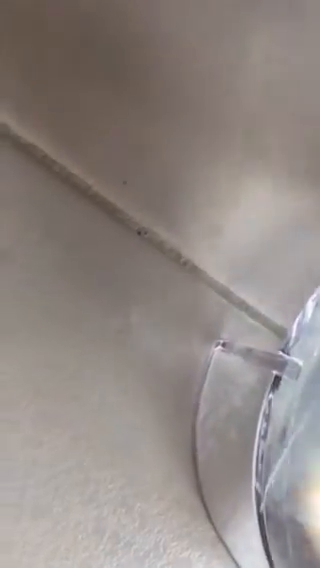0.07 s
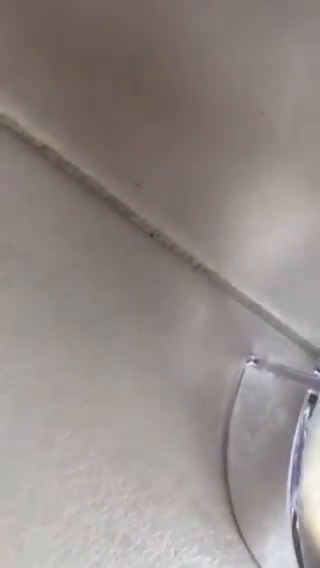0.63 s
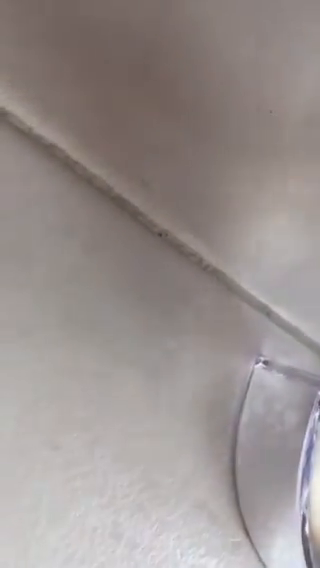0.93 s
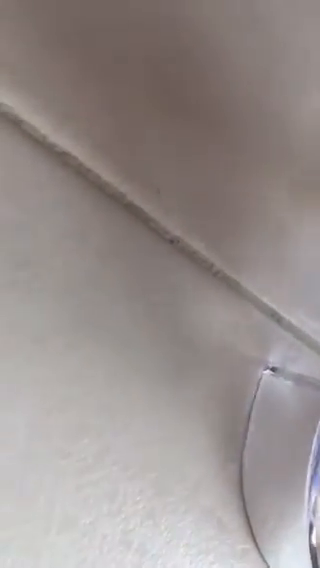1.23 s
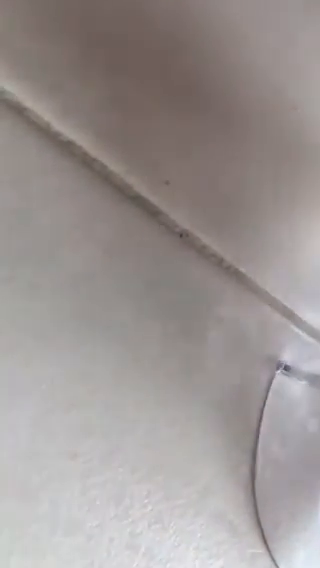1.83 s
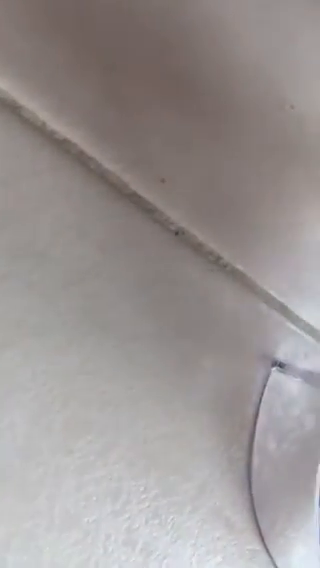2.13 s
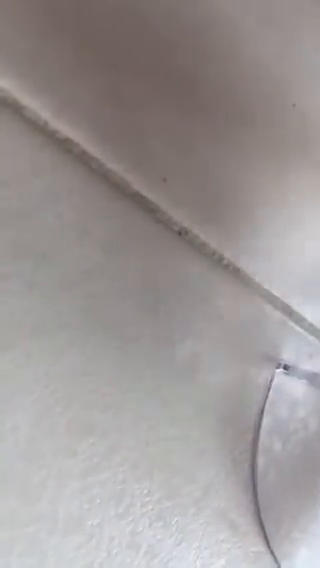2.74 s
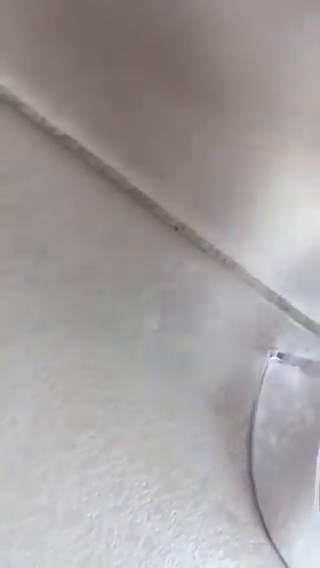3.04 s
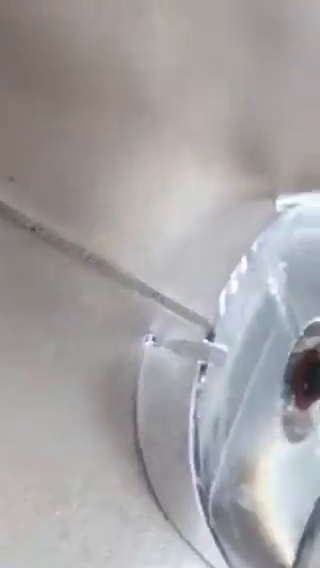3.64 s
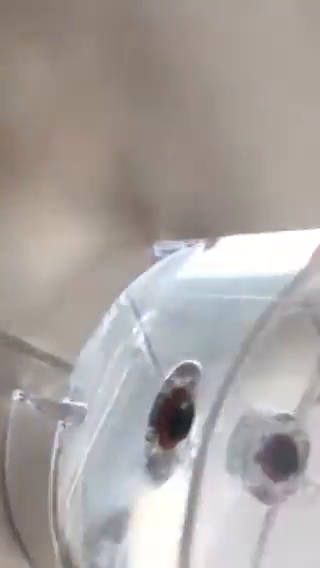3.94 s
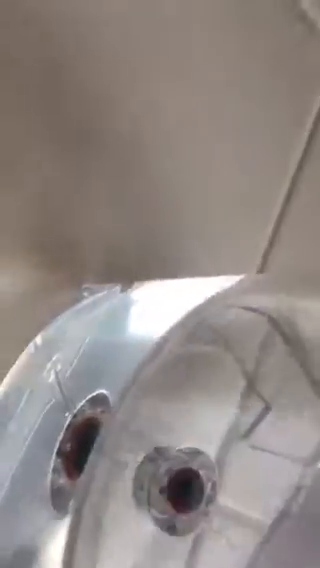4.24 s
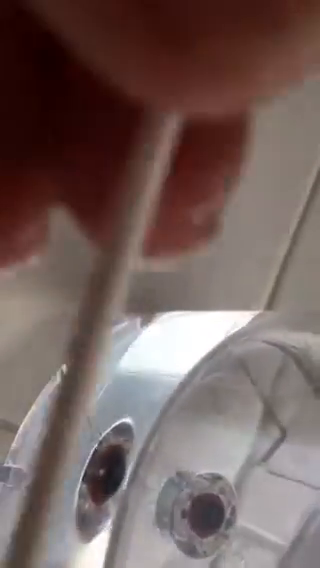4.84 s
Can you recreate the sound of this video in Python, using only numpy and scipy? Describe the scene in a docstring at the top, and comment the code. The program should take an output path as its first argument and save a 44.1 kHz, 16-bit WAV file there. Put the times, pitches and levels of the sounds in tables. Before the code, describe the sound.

Light clicks, soft rubs and short knocks from a thin plastic container being handled and put down in a quiet tiled room.

```python
"""A clear plastic tank is turned in the hands and set down, close to a phone in a tiled room.
Skin rubs and rasps over its thin walls, and plastic catching on plastic makes them tick and creak.
The tank gives short knocks against its fittings, lands with a hollow bump, then knocks twice more.
The room rings briefly after each sound, over a quiet rumble, a faint hiss and a low mains hum."""
import sys
import numpy as np
from scipy import signal
from scipy.fft import rfft, irfft, next_fast_len
from scipy.io import wavfile
from scipy.ndimage import map_coordinates

SR = 44100
rng = np.random.default_rng(int(sys.argv[2]) if len(sys.argv) > 2 else 0)


def generate_wav(signal):
    """Clip the signal to [-1, 1] and save it as 16-bit WAV at the path in sys.argv[1]."""
    frames = np.transpose(np.atleast_2d(signal))
    scaled = np.clip(frames, -1, 1) * 32767
    pcm = np.round(scaled).astype(np.int16)
    wavfile.write(sys.argv[1], SR, pcm)


N = 223843

# A "colour" says how strong each frequency is next to the others.
# A "ring time" (t60) is how long a sound takes to fade by 60 dB.
# The low rumble of the quiet room. Each row: frequency in Hz, relative level in dB.
RUMBLE_COLOUR = [(15, -41), (25, 21), (38, -5.5), (123, -2.5), (216, -9.5), (265, -7), (378, -8.5),
                 (530, -21.5), (627, -17.5), (676, -24.5), (947, -22), (1280, -29), (2200, -45),
                 (2860, -62), (4840, -120)]
# A faint hiss that creeps up. Each row: time in seconds, level in dB.
HISS_LEVELS = [(0, -73), (2.5, -70.5), (3.3, -65), (3.7, -66), (4.3, -68.5), (4.6, -65.5), (5.0, -69)]
# The colour of that hiss. Each row: frequency in Hz, relative level in dB.
HISS_COLOUR = [(1000, 0), (2000, -0.5), (3500, 0), (5000, -2.5), (10000, -0.5), (16000, 1.5)]
# The tones of an appliance's hum. Each row: frequency in Hz, average level in dB.
HUM_TONES = [(48.3, -57), (80.5, -62.5), (120, -61.5)]
# Fingers sliding to a new grip. Each row: start in seconds, seconds until it fades, level in dB.
SLIDES = [(0.255, 0.21, -63), (0.474, 0.18, -67), (0.913, 0.25, -59), (1.21, .21, -56.5),
          (1.493, .055, -60), (1.669, 0.12, -59.5), (1.86, 0.22, -60.5), (2.58, .15, -71), (2.709, .3, -53),
          (3.07, 0.2, -56.5)]
# Skin rubbing on plastic. Each row: frequency in Hz, relative level in dB.
RUB_COLOUR = [(500, 7.5), (1100, -12), (1700, 2), (2150, -8.5), (2600, -1.5), (3000, -6), (4100, -4.5),
              (5000, -5.5), (6400, -2), (8000, -7), (12500, -4), (16000, -6)]
# Treble bands the walls give off best. Each row: centre in Hz, width in Hz, strength in dB.
BRIGHT_BANDS = [(2340, 380, -1.5), (3270, 86, 1.5), (4100, 60, -5.5), (6060, 94, -7.5), (7700, 28, -14.5),
                (8850, 180, 0), (9400, 84, -8), (11900, 580, -4), (11500, 134, -6), (12870, 99, -8.5),
                (14900, 135, -8.5), (14050, 60, -8.5)]
# How long the thin walls ring. Each row: frequency in Hz, ring time in seconds.
WALL_RING_TIMES = [(300, 0.11), (1500, 0.082), (2100, 0.027), (2650, 0.057), (3300, 0.052), (6000, 0.039),
                   (12000, 0.023), (16000, 0.018)]
# The side panel's own notes. Each row: frequency in Hz, gain in dB, ring time in seconds.
PANEL_NOTES = [(2376, -5.5, .025), (2574, -4.5, 0.05), (2702, 3.5, 0.06), (3390, -9, 0.034),
               (4035, -9, 0.047), (6500, -9.5, 0.021), (9100, -6, .02), (11900, -8, 0.014),
               (13000, -7.5, .02)]
# A finger dragged over the wall.
# Each row: start in seconds, length in seconds, rasp level in dB, shell drone level in dB.
DRAGS = [(0.072, 0.076, -63, -67), (0.211, 0.043, -55.5, -64), (0.256, 0.087, -60.5, -67),
         (0.291, 0.2, -52.5, -68), (0.8, 0.07, -65, -64), (0.954, 0.081, -65, -52),
         (1.018, 0.063, -57, -47), (1.763, 0.069, -62.5, -55), (3.195, 0.034, -42, -48)]
# The rasp of that finger. Each row: frequency in Hz, relative level in dB.
RASP_COLOUR = [(1200, -18.5), (2600, -8.5), (3350, 3), (4500, -2), (5200, -12), (6300, -9), (9000, -13),
               (13000, -1.5), (16000, -12)]
# The shell's notes. Each row: frequency in Hz, relative level in dB, ring time in seconds.
SHELL_NOTES = [(175, -5.5, 0.065), (259.4, 0.5, 0.031), (297, -0.5, 0.19), (336, -4.5, 0.24),
               (395, -4, 0.083), (478.5, -1, 0.54), (546.5, 2.5, .06), (610, 0, 0.052), (697, 2, 0.066),
               (750, -5, 0.035), (894, -3.5, .06), (1030, -2, .06), (1270, -2.5, 0.014), (1572, -3.5, 0.2),
               (1615, -7.5, 0.11), (1800, -3.5, 0.12), (1867, -1, 0.14), (2378, -0.5, 0.025),
               (2400, -5.5, 0.063), (2654, 0.5, 0.077), (3095, -2.5, 0.025), (3370, -3, 0.098),
               (3830, -0.5, 0.017), (4550, 3, .05)]
# Sharp ticks of plastic catching on plastic.
# Each row: start in seconds, treble level in dB, level of the lower ring in dB relative to the treble.
TICKS = [(0.232, -51.5, -7), (0.283, -51, 2.5), (0.3369, -37, 1), (0.4459, -61.5, 10), (0.7142, -62, 5),
         (0.9583, -39.5, -1.5), (0.969, -50, 2), (0.9776, -43.5, -9), (1.0137, -32.5, -16.5),
         (1.04, -50.5, 7.5), (1.0588, -41.5, -34), (1.1291, -42.5, -9), (1.143, -49.5, 5),
         (1.2408, -43.5, 2.5), (1.2519, -40.5, 3.5), (1.258, -37.5, 0), (1.3116, -40, -13),
         (1.348, -51.5, -5), (1.4263, -49.5, -2), (1.4531, -46, -7.5), (1.4941, -39.5, -4.5),
         (1.5327, -52, 6), (1.6207, -57, 0.5), (1.6472, -56, -21.5), (1.6664, -54.5, -20),
         (1.7134, -50, -4), (1.8214, -44.5, -9), (1.9351, -40, -11), (2.0145, -24.5, 1),
         (2.7628, -38.5, -10), (2.7709, -41, -3), (2.8079, -38, -9), (2.812, -35, -6.5), (2.84, -34, -1.5),
         (2.8494, -35.5, 3.5), (2.8917, -33.5, -21), (2.9015, -36.5, 1), (2.9248, -19.5, -3),
         (2.94, -29.5, -1), (2.9809, -31.5, -6), (3.0103, -36.5, 1.5), (3.2025, -40.5, -12),
         (3.2216, -38, 4.5), (4.022, -48.5, 5)]
# The colour of a tick. Each row: frequency in Hz, relative level in dB.
TICK_COLOUR = [(200, -1.5), (800, -10), (1650, -4.5), (2150, -8.5), (2600, -1), (3000, -5.5), (4000, -1),
               (5000, -2.5), (6400, 0.5), (8500, -0.5), (10500, -2.5), (13000, 2), (15300, -1),
               (16300, -6.5)]
# Short, damped knocks on the tank, during handling and after it is set down.
# Each row: start in seconds, thump level in dB, thump centre in Hz,
# clack level in dB, clack centre in Hz, extra fading in dB per second.
KNOCKS = [(0.334, -32, 203, -33.5, 610, 500), (1.133, -39, 303, -55, 900, 502),
          (1.2432, -31, 260, -35, 430, 250), (1.472, -42.5, 147, -69, 600, 102),
          (1.4946, -56, 400, -41, 3420, 500), (2.0152, -29.5, 687, -23, 2500, 502),
          (2.128, -44, 381, -57, 800, 1200), (2.8388, -30.5, 380, -41.5, 870, 600),
          (2.9235, -25.5, 397, -29.5, 2440, 252), (2.941, -42, 500, -43.5, 1000, 597),
          (2.983, -42, 450, -54.5, 900, 499), (3.2225, -31.5, 240, -35.5, 1390, 500),
          (3.2455, -32, 376, -44, 800, 900), (3.743, -38, 269, -51, 790, 1000),
          (4.021, -42.5, 550, -38.5, 1410, 700)]
# The tank's notes on the tiles. Each row: frequency in Hz, relative level in dB, ring time in seconds.
STANDING_NOTES = [(120, -27, 0.31), (242, -14.5, 0.072), (333, -12.5, 0.197), (375.6, -13, 0.32),
                  (589, -7, 0.21), (651, 3, 0.051), (686, -6, 0.09), (800, -17.5, 0.12), (920, -23, 0.13),
                  (982, -17, 0.09), (1110, -14.5, 0.097), (1210, -25, .08), (1303, -24, 0.13),
                  (1610, -22, 0.12), (1747, -18, 0.052), (2206, -22.5, 0.1)]
# How long the room rings. Each row: frequency in Hz, ring time in seconds.
ROOM_RING_TIMES = [(150, 0.77), (680, 0.6), (2500, 0.65), (6000, 0.45), (14000, 0.23)]
# The colour of the room's echo. Each row: frequency in Hz, relative level in dB.
ROOM_COLOUR = [(150, 4), (450, 2.5), (680, 6.5), (1100, -1), (2800, 2.5), (6000, 4), (14000, 4)]

TOP_HZ = 16150  # the highest frequency the phone picks up
LET_GO_S = 3.3  # the hand lets go


def amp(db):
    """Turn decibels into a plain multiplier."""
    return 10 ** (np.asarray(db) / 20)


def unit(x):
    """Scale x to an average (rms) level of 1."""
    return x / np.sqrt(np.mean(x ** 2) + 1e-20)


def along(points, hz):
    """Read between the rows of a (Hz, value) table, on a log frequency scale."""
    frequencies, values = np.transpose(points)
    return np.interp(np.log(hz + 1), np.log(frequencies + 1), values)


def wobble(rate):
    """A smooth curve through this many random points a second."""
    points = rng.standard_normal(int(N * rate / SR) + 4)
    return map_coordinates(points, [np.arange(N) * rate / SR])


def filtered(x, response):
    """Scale each frequency in x by response(hz)."""
    size = next_fast_len(N + SR // 2)
    return irfft(rfft(x, size) * response(np.fft.rfftfreq(size, 1 / SR)), size)[:N]


def coloured(x, colour):
    """Give x the colour in a table."""
    return filtered(x, lambda hz: amp(along(colour, hz)))


def add(track, start, sound):
    """Mix a sound in at a start time in seconds."""
    part = track[round(start * SR):][:len(sound)]
    part += sound[:len(part)]


def ringing(hz, t60, samples):
    """One fading sine wave per row."""
    t = np.arange(samples) / SR
    return np.sin(2 * np.pi * hz[:, None] * t) * amp(-60 * t / t60[:, None])


def burst(x, seconds):
    """Give x the energy of a 0 dB sound held for this long."""
    return x / np.sqrt(np.sum(x ** 2) / (seconds * SR) + 1e-20)


def rise(x, seconds):
    """Let x swell in while a contact builds up."""
    return x * (1 - np.exp(-(np.arange(len(x)) / SR / seconds) ** 2))


def reach(hz, centre_hz, octaves):
    """A contact stirs notes near its centre frequency most; octaves sets the width."""
    return (1 + (np.log2(hz / centre_hz) / octaves / 2) ** 2) ** -2.5


def background(rumble_db=-49):
    """Room rumble, a faint hiss and the unsteady hum of an appliance."""
    t = np.arange(N) / SR
    hiss_level = amp(np.interp(t, *np.transpose(HISS_LEVELS)))
    hiss = hiss_level * unit(coloured(rng.standard_normal(N), HISS_COLOUR))
    hum = np.zeros(N)
    for hz, db in HUM_TONES:
        peak = amp(db + 2.3 * wobble(3.67)) * np.sqrt(2)
        hum += peak * np.sin(2 * np.pi * hz * t + 0.5 * wobble(2.8))
    rumble = amp(rumble_db) * unit(coloured(rng.standard_normal(N), RUMBLE_COLOUR))
    return rumble + hiss + hum


def sliding(swell_s=0.089, fade_db_per_s=169, resting_db=-76.5):
    """How hard the fingers rub: each slide swells and dies away, above a faint steady level."""
    t = np.arange(N) / SR
    level = np.zeros(N)
    for start, length, db in SLIDES:
        swell = np.clip((t - start) / swell_s, 0, 1)
        fade_db = fade_db_per_s * np.maximum(t - start - length, 0)
        level = np.maximum(level, swell * amp(db - fade_db))
    holding = np.interp(t, [LET_GO_S - 0.02, LET_GO_S + 0.02], [1, 0])
    return level * holding + amp(resting_db)


def wall_brightness(hz, base):
    """The walls give off a few treble bands more strongly than the rest."""
    return base + sum(amp(db) / np.hypot(1, 2 * (hz - centre) / width)
                      for centre, width, db in BRIGHT_BANDS)


def rubbing(slide, catches_per_s=200):
    """Skin slips over the plastic in countless tiny catches."""
    catches = (rng.random(N) < catches_per_s / SR) * amp(4 * rng.exponential(size=N).clip(0, 3.5))
    catch_fade = np.exp(-np.arange(SR // 50) / SR / 0.0045)
    grip = np.sqrt(np.abs(signal.fftconvolve(catches ** 2, catch_fade)[:N]) + 0.5)
    friction = grip * rng.standard_normal(N)
    hiss = filtered(friction, lambda hz: amp(along(RUB_COLOUR, hz)) * wall_brightness(hz, base=0.93))
    return slide * unit(hiss)


def creaks(slide, per_s=28):
    """Rows like those of TICKS: small, unevenly spaced ticks about as strong as the rubbing."""
    count = int(LET_GO_S * per_s) + 2
    time_scatter, level_scatter, ring_scatter = rng.standard_normal((3, count))
    times = (np.arange(count) + 0.4 * time_scatter) / per_s
    rub_db = 20 * np.log10(np.interp(times, np.arange(N) / SR, slide))
    treble_db = rub_db + 1 + 3 * level_scatter
    ring_db = -0.5 + 3 * ring_scatter
    rows = np.column_stack([times, treble_db, ring_db])
    return rows[(times > 0) & (times < LET_GO_S)]


def wall_notes(count=500):
    """The thin walls have too many notes to tell apart, all dying fast."""
    hz = 150 + (TOP_HZ - 150) * (np.arange(count) + rng.random(count)) / count
    return hz, ringing(hz, along(WALL_RING_TIMES, hz), SR // 12)


def side_panel(x):
    """The side panel rings on after each rub, tick and knock."""
    t = np.arange(SR // 8) / SR
    notes = np.zeros(len(t))
    for hz, db, t60 in PANEL_NOTES:
        scale = 2 * np.log(1000) / (t60 * SR)  # keeps a long ring from raising the note's gain
        notes += scale * amp(db - 60 * t / t60) * np.cos(2 * np.pi * hz * t)
    return x + signal.fftconvolve(x, notes)[:N]


def drags():
    """A firmly dragged finger makes a dry, fluttering rasp and sets the shell droning."""
    rasp_level, drone_level = np.zeros(N), np.zeros(N)
    for start, length, rasp_db, drone_db in DRAGS:
        pressure = np.sqrt(np.hanning(round(length * SR)))
        add(rasp_level, start, amp(rasp_db) * pressure)
        add(drone_level, start, amp(drone_db) * pressure)
    friction = amp(2.9 * wobble(350)) * rng.standard_normal(N)
    rasp = coloured(friction, RASP_COLOUR)
    hz, db, t60 = np.transpose(SHELL_NOTES)
    stirred = amp(db) * reach(hz, centre_hz=805, octaves=0.96)
    shell_ring = stirred @ ringing(hz, t60 / 2, SR // 10)
    drone = signal.fftconvolve(friction, shell_ring)[:N]
    return rasp_level * unit(rasp) + drone_level * unit(drone)


def ticks(rows, wall_hz, wall_rings):
    """Each tick shakes the walls anew; heavy contacts favour the lower notes, light ones die sooner."""
    out = np.zeros(N)
    colour = amp(along(TICK_COLOUR, wall_hz)) * wall_brightness(wall_hz, base=0.81)
    treble_share = np.clip(np.log2(wall_hz / 3000) / 1.8, 0, 1)
    t = np.arange(wall_rings.shape[1]) / SR
    strength = colour * rng.standard_normal((len(rows), len(wall_hz)))
    highs = strength * treble_share @ wall_rings
    lows = strength * (1 - treble_share) @ wall_rings
    for (start, db, ring_db), high, low in zip(rows, highs, lows):
        fade = amp(130 * min(ring_db, 0) * t)  # a weak ring also shortens the crack
        crack = burst(rise(high * fade, 0.0003), 0.0028)
        ring = burst(rise(low, 0.00019), 0.002)
        add(out, start, amp(db) * (crack + amp(ring_db) * ring))
    return out


def damped(ring, centre_hz, fade_db_per_s):
    """A blow's ring swells in, then is cut short."""
    contact_s = 0.72 / centre_hz  # soft, low blows press for longer
    fade = amp(-fade_db_per_s * np.arange(len(ring)) / SR)
    return burst(rise(ring, contact_s) * fade, 0.0038)


def knocks(wall_hz, wall_rings):
    """A blow thumps the whole shell and clacks the walls where it lands."""
    out = np.zeros(N)
    note_hz, note_db, t60 = np.transpose(SHELL_NOTES)
    shell_rings = ringing(note_hz, t60, SR // 3)
    for start, thump_db, thump_hz, clack_db, clack_hz, fade_db_per_s in KNOCKS:
        thump = (thump_hz, 0.4, thump_db, thump_db - 5.5)  # mostly the shell
        clack = (clack_hz, 0.75, clack_db - 4.5, clack_db)  # mostly the walls
        for centre_hz, octaves, shell_db, walls_db in (thump, clack):
            shell = amp(note_db + rng.normal(0, 1, len(note_hz))) * reach(note_hz, centre_hz, octaves)
            walls = rng.standard_normal(len(wall_hz)) * reach(wall_hz, centre_hz, octaves)
            walls /= np.sqrt(wall_hz)
            add(out, start, amp(shell_db) * damped(shell @ shell_rings, centre_hz, fade_db_per_s))
            add(out, start, amp(walls_db) * damped(walls @ wall_rings, centre_hz, fade_db_per_s))
    return out


def set_down(start, gain_db):
    """The tank lands on the tiles with a hollow bump and rings freely."""
    out = np.zeros(N)
    hz, db, t60 = np.transpose(STANDING_NOTES)
    bump = amp(db) @ ringing(hz, t60, SR // 2)
    add(out, start, amp(gain_db) * rise(bump, 0.00079))
    return out


def room(x, echo_db, delay_s=0.0056):
    """Hard walls and tiles throw the sound back; each frequency dies at its own speed."""
    hz, t, noise = signal.stft(rng.standard_normal(SR * 3 // 4), SR, nperseg=256)
    decay_db = along(ROOM_COLOUR, hz)[:, None] - 60 * t / along(ROOM_RING_TIMES, hz)[:, None]
    tail = signal.istft(noise * amp(decay_db), SR, nperseg=256)[1]
    tail = np.pad(tail / np.linalg.norm(tail), (round(delay_s * SR), 0))
    return x + amp(echo_db) * signal.fftconvolve(x, tail)[:N]


def scene():
    """The tank is handled and set down in the humming, tiled room."""
    wall_hz, wall_rings = wall_notes()
    slide = sliding()
    rubs = rubbing(slide)
    ticking = ticks(np.vstack([TICKS, creaks(slide)]), wall_hz, wall_rings)
    blows = knocks(wall_hz, wall_rings)
    tank = side_panel(rubs + ticking + blows) + drags() + set_down(start=3.2241, gain_db=-16)
    return (room(tank, echo_db=-16.5) + background())[None]


def record(dry):
    """The phone drops the deepest bass and the very highest treble."""
    low_cut_hz = 39.0
    return filtered(dry[0], lambda hz: hz ** 14 / (hz ** 14 + low_cut_hz ** 14) * (hz < TOP_HZ))[None]


dry = scene()
out = record(dry)
generate_wav(out)
```